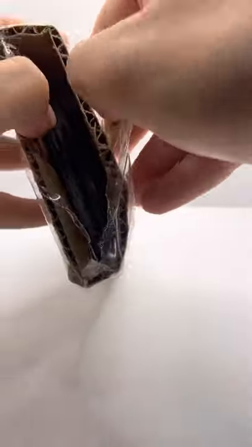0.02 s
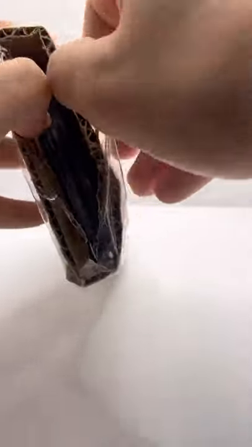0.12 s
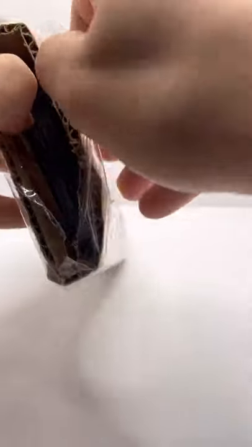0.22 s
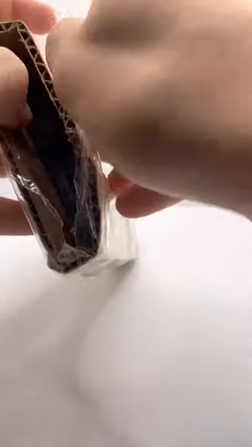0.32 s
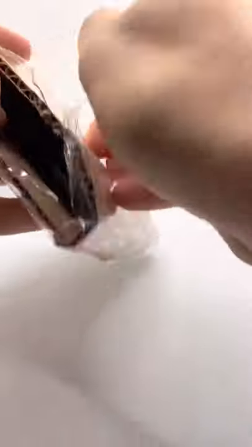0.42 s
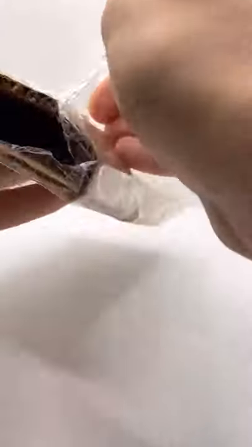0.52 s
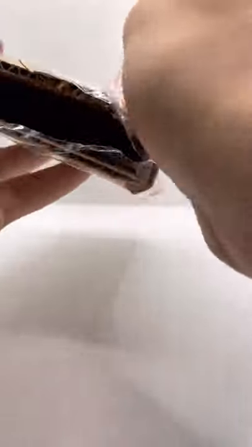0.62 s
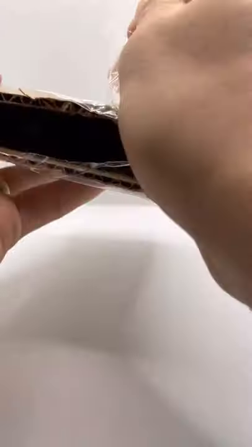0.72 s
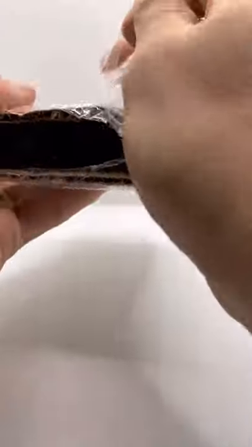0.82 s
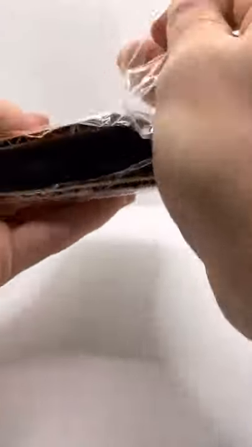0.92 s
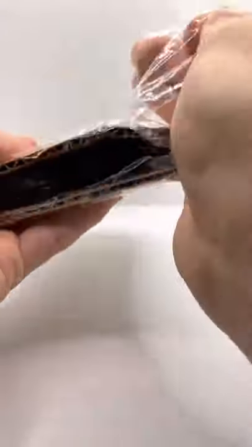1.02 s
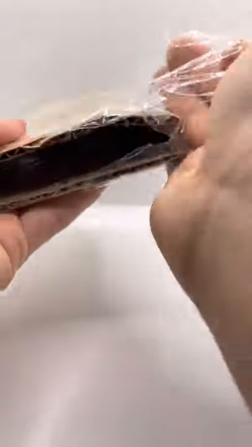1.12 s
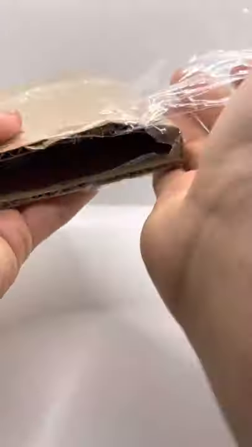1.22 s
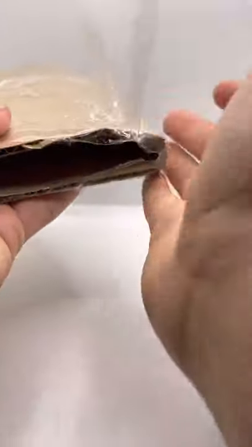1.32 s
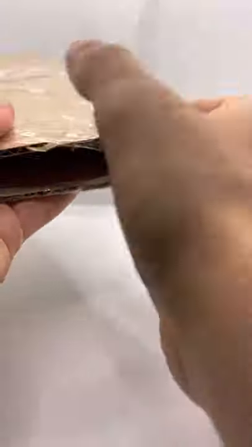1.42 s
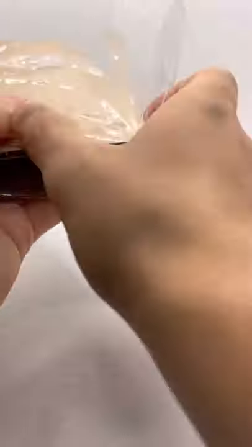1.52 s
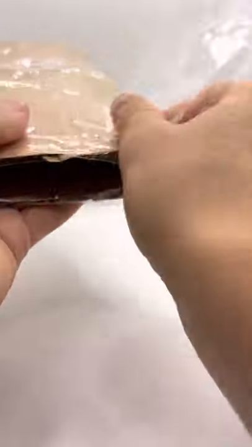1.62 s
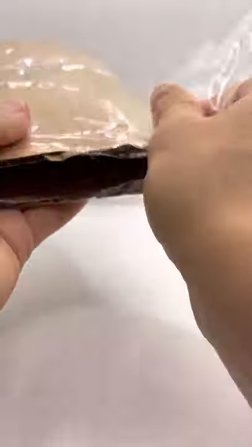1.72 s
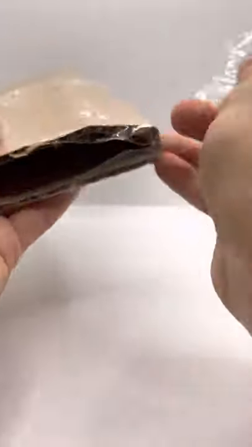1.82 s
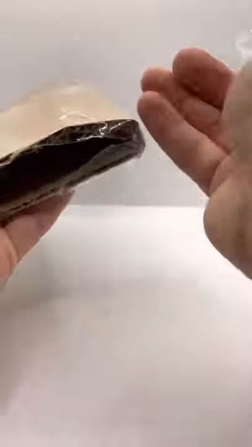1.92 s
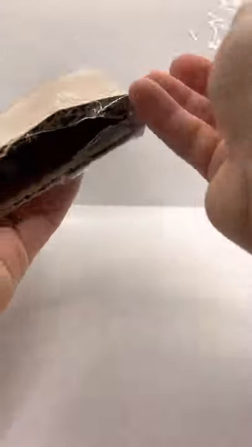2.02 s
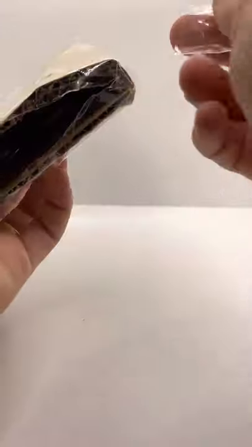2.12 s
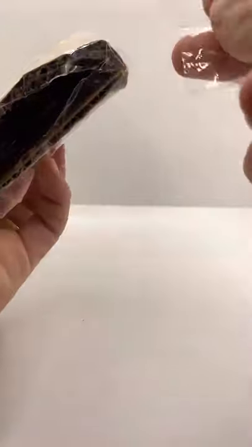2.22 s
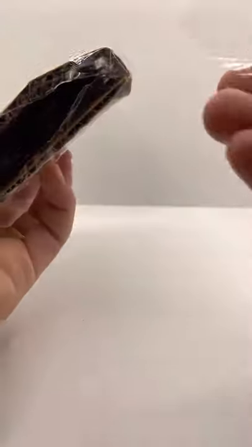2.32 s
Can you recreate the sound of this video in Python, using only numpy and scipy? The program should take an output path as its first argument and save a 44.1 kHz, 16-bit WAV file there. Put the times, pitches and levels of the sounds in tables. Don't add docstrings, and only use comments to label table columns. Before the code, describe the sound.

Thin plastic wrap is picked and ripped off a cardboard mailer: sharp crackling snaps, a second tearing pull, a weak lull, one last burst, then faint crinkles. Close phone microphone in a small quiet room, stereo.

```python
import sys
import numpy as np
from scipy import signal
from scipy.fft import rfft, irfft
from scipy.io import wavfile
from scipy.ndimage import uniform_filter1d

SR = 44100
rng = np.random.default_rng(int(sys.argv[2]) if len(sys.argv) > 2 else 0)


def field_ratio(decibels):
    return 10 ** (np.asarray(decibels, dtype=float) / 20)


def unload_wav(signal):
    wavfile.write(
        sys.argv[1],
        SR,
        np.round(np.clip(np.atleast_2d(signal).T, -1, 1) * 32767).astype(np.int16),
    )


N = 105840

# [f/Hz, level/dB]
RUMBLE_SPECTRUM = [(30, -24), (60, -1.5), (140, 2), (280, 5.5), (450, -6), (1200, -28), (4000, -37),
                   (12000, -52)]
# [f/Hz, time to fall 60 dB/s]
ROOM_DECAY = [(300, 0.24), (1500, 0.12), (5000, 0.13), (12000, 0.1)]
# [t/s, slide level/dB, grip level/dB]
RUSTLE = [(0, -62.5, 11), (.06, -53, 12.5), (.12, -64, 10.5), (.22, -63.5, 14), (.55, -69, -6.5),
          (.66, -75, 1), (.75, -73.5, 5), (1.2, -61, -2.5), (1.35, -79, 3), (1.5, -83.5, -1.5),
          (1.6, -72.5, 5.5), (1.9, -77, -0.5), (2.24, -75.5, -1), (2.4, -74.5, 2)]
# [t/s, peak level/dB, f/Hz]
PUSHES = [(0.322, -32, 257), (0.298, -44, 207), (0.459, -36.5, 238), (0.489, -51, 81), (0.77, -30, 200),
          (0.913, -26, 199), (0.989, -43.5, 151), (1.37, -33, 289), (1.385, -46, 62.3),
          (1.431, -48.5, 59.7), (1.627, -49, 71), (1.766, -37, 290)]
# [t/s, peak level/dB, f/Hz, time to fall 60 dB/s]
RINGS = [(0.2997, -16.5, 1410, .02), (0.322, -24, 600, .04), (0.323, -20.5, 1750, .03),
         (0.275, -16, 4090, .02), (0.432, -33.5, 1450, .03), (0.456, -22, 1400, .03),
         (0.771, -12, 1500, .04), (0.77, -25, 4080, .03), (0.776, -15, 4550, .04),
         (0.913, -20.5, 1750, .03), (0.95, -20, 4140, .03), (0.989, -12.5, 2260, .02),
         (1.152, -27.5, 2730, .03), (1.714, -24.5, 1680, .04), (1.903, -41.5, 1320, .02)]
# [t/s, peak level/dB, board level/dB, sizzle level/dB, swarm/s]
SNAPS = [(0.0562, -32, 3, -8, 0.0085), (0.0698, -35, 5.5, -13, 0.015), (0.144, -44.5, -16, -6, 0.005),
         (0.1548, -44.5, -25, 3, 0.0046), (0.1898, -35.5, -9, 7.5, 0.0073), (0.2466, -16, -12, -5, 0.003),
         (0.2732, -13.5, -9.5, -1.5, 0.0037), (0.296, -28.5, 5, -15.5, 0.0055),
         (0.305, -15, -21, -3, 0.004), (0.3217, -9.5, -10, -4.5, 0.0038), (0.3613, -19.5, -30, 3.5, 0.0025),
         (0.3767, -31, -18, 3.5, 0.004), (0.39, -17.5, -32.5, 1, 0.0027), (0.405, -15, -5, 1.5, 0.0091),
         (0.5825, -43.5, -6, -14, 0.0064), (0.758, -44, -13, -15, 0.012), (0.7703, -11.5, -3.5, -3, 0.01),
         (0.8849, -18.5, -6.5, -2.5, 0.0018), (0.9129, -15, -1.5, 1.5, 0.0026), (0.95, -19.5, 5, 2, 0.0025),
        (0.9802, -13.5, -5.5, -5, 0.0031), (0.9898, -13, -8.5, -3.5, 0.0063),
        (1.045, -15.5, -13.5, -10.5, 0.0019), (1.063, -23.5, -17, -2, 0.0041), (1.0826, -32, -6, 3, 0.0067),
        (1.1084, -26, -12, 3.5, 0.0039), (1.1529, -23.5, -5.5, -0.5, 0.0033),
        (1.1726, -28.5, -6, 1.5, 0.0068), (1.2246, -29.5, -14.5, -4.5, 0.0081),
        (1.255, -27.5, -22, -2.5, 0.014), (1.286, -37.5, -8, 9, 0.003),
        (1.3692, -57.5, 16.5, -19.5, 0.0046), (1.4738, -49, 3, -36, 0.0015),
        (1.61, -38.5, -35, -28, 0.0015), (1.6212, -26.5, -18, -4.5, 0.0072), (1.688, -28, -16, 1, 0.0056),
        (1.7158, -12, -12.5, -4, 0.0092), (1.727, -19, -7, 2.5, 0.0047), (1.7583, -22, -8, -15, 0.0036),
        (1.7653, -12.5, -37, -0.5, 0.0012),
         (0.265, -28.5, -13.5, -1.5, 0.0041), (0.42, -15, -16.5, -5.5, 0.0024),
           (0.428, -18.5, -3, -2.5, 0.0095), (0.4524, -13.5, -10, -3, 0.0018),
           (0.466, -28, -8.5, 3, 0.0048), (0.485, -25, -3, 4.5, 0.0029),
           (0.4857, -20.5, -17.5, -1.5, 0.0011), (0.913, -10.5, -7.5, -9.5, 0.0059),
           (0.957, -16.5, -10, -12.5, 0.0074), (1.013, -22.5, -23, -10, 0.01), (1.277, -39, -9, -2, .002),
           (1.128, -47, -27.5, 3.5, 0.0027), (1.769, -19.5, -21, -5, .004),
           (1.7697, -11.5, -12.5, 2.5, 0.0016), (1.784, -17.5, -5.5, -2, 0.0019),
           (1.792, -27.5, -9, -2.5, 0.0043), (1.805, -27, -3.5, 4, 0.0035)]
# [t/s, peak level/dB, board level/dB, sizzle level/dB, swarm/s]
CRINKLES = [(1.399, -54.5, -3.5, -10.5, 0.0075), (1.57, -60.5, 6.5, 2, .006),
            (1.6366, -34.5, -0.5, 5.5, 0.0071), (1.654, -33.5, -2.5, 0.5, 0.007),
            (1.8592, -42.5, -12, -2.5, 0.0028), (1.8722, -45, -5.5, -10, 0.0039),
            (1.9027, -32.5, -11, 4, 0.0032), (1.9444, -45, 1.5, -10, 0.013), (2.003, -42.5, -6, -13, .0015),
            (2.036, -48.5, -6.5, -3, 0.0072), (2.0575, -42.5, -16, 6.5, 0.0021),
            (2.1233, -36.5, -6, -10, 0.0017), (2.179, -50, 3, -20, .002), (2.214, -57, -10, -25.5, 0.0042),
            (2.2647, -53.5, 5, -23, 0.0039), (2.287, -43.5, -7.5, -17, 0.0043),
            (2.306, -39.5, -10, -16.5, .0015), (2.3217, -35.5, -12, -5, 0.00072),
            (2.353, -46.5, -4.5, -10, 0.011), (2.373, -48, -2, -8, .003)]
# [t/s, effort level/dB]
PULLS = [
    [(.247, -44), (.33, -50.5), (.40, -38), (.41, -32), (.455, -28.5), (.495, -37.5), (.512, -74)],
    [(.914, -28), (.96, -25.5), (1.0, -32), (1.04, -42), (1.10, -65)],
    [(1.255, -38), (1.295, -55.5), (1.32, -87.5)],
    [(1.61, -64), (1.71, -43.5), (1.74, -38.5), (1.77, -26), (1.81, -40), (1.84, -63)],
]
# [f/Hz, width/Hz, lift level/dB]
PANEL = [(598.6, 90, 3.3), (1500, 27, 1.1), (4080, 63, 1)]
# [f/Hz, level/dB]
MIC_COLOUR = [(1500, 1.5), (3000, 0.5), (6500, 4), (11200, 12.5), (12500, 3.5), (13500, -8), (15000, -15.5)]
# [f/Hz, phase/radians]
LEFT_LEAD = [(1700, 0), (2800, .9), (4200, .7), (5800, 6.2), (8300, 9.15), (9700, 9.6), (12000, 12.4),
             (13800, 12.7), (14500, 15.6)]
# [f/Hz, likeness/0-1]
CHANNEL_LIKENESS = [(300, .994), (800, .93), (1150, .55), (1450, .97), (2100, .95), (2700, .45), (4300, .8),
                    (4900, .92), (5800, .97), (7300, .82), (8400, .998), (9700, .998), (10500, .92),
                    (13000, .98)]
# [t/s, level/dB]
ASIDE = [
    (0.221, -27.5),
    (.3, -17.5),
    (0.401, -16.5),
    (0.419, -37),
    (.97, -45.5),
    (0.991, -10.5),
    (1.3, -16),
    (1.6, -17.5),
    (1.79, -14),
    (1.812, -17),
]

ROOM_DB = -12.5
RUMBLE_DB, HUM_DB, LUMPS_DB = -62.5, -63, 1.1
HUM_HZ, HUM_WIDTH_HZ = 144, 29
PUSH_CYCLES, PUSH_DB, PUSH_LOW_HZ = 6, 5.5, 60
RING_RISE_S = 0.0009
BOARD, FILM, SIZZLE = (400, 2200, 5), (1800, 7500, 4), (7000, 14500, 5)
CRACKS_PER_S, SPREAD_DB = 12000, 3.5
CLUMP_DB, CLUMPS_PER_S = 2.5, 160
RISE_S, DIE_S, CREST_DB = 0.00011, 0.0034, -8.5
FIRST_CRACK, FIRST_S = 0.25, 0.0012
PULL_BOARD_DB, PULL_SIZZLE_DB = -6.5, -4
RUSTLE_BOARD_DB, RUSTLE_SIZZLE_DB = -1.5, -4
PANEL_LOW_HZ = 320
EDGE_HZ = 16400
ASIDE_HZ, ASIDE_WIDTH_HZ = 9300, 2700
CEILING = 0.8


def evened(x):
    return x / np.sqrt(np.mean(x ** 2) + 1e-20)


def read(points, hz):
    f, value = np.transpose(points)
    return np.interp(np.log(hz + 1), np.log(f + 1), value)


def add(mix, s, sound):
    part = mix[..., round(s * SR):][..., :sound.shape[-1]]
    part += sound[..., :part.shape[-1]]


def shaped(x, gain):
    return irfft(rfft(x) * gain, N)


def rumble():
    hz = np.fft.rfftfreq(N, 1 / SR)
    s, _, grip_db = np.transpose(RUSTLE)
    wide = evened(shaped(rng.standard_normal(N), field_ratio(read(RUMBLE_SPECTRUM, hz))))
    drone = evened(shaped(rng.standard_normal(N), 1 / (1 + ((hz - HUM_HZ) / HUM_WIDTH_HZ) ** 2)))
    lumps = evened(shaped(rng.standard_normal(N), 1 / (1 + (hz / 24.0) ** 2)))
    swell_db = LUMPS_DB * lumps + np.interp(np.arange(N) / SR, s, grip_db)
    return (field_ratio(RUMBLE_DB) * wide + field_ratio(HUM_DB) * drone) * field_ratio(swell_db)


def room(x):
    taps = np.zeros(SR // 2)
    at = np.arange(200, len(taps) - 20, 10)
    taps[at + rng.integers(0, 10, len(at))] = rng.choice([-1., 1.], len(at))
    hz, t, z = signal.stft(taps, SR, nperseg=256)
    fade = field_ratio(-60 * t / read(ROOM_DECAY, hz)[:, None])
    tail = signal.istft(z * fade, SR, nperseg=256)[1]
    return signal.fftconvolve(x, tail / np.linalg.norm(tail))[:N]


def pushes():
    out, t = np.zeros(N), np.arange(8000) / SR
    for s, db, hz in PUSHES:
        thud = np.sin(2 * np.pi * hz * t) + 0.5 * np.sin(2 * np.pi * hz * t / 1.3)
        fade = field_ratio(db + PUSH_DB - 60 * t * hz / PUSH_CYCLES)
        add(out, s, fade * np.minimum(t / 0.002, 1) * thud)
    return signal.sosfilt(signal.butter(2, PUSH_LOW_HZ, "high", fs=SR, output="sos"), out)


def rings():
    out, t = np.zeros(N), np.arange(4000) / SR
    wavers = rng.standard_normal((len(RINGS), 4000))
    for (s, db, hz, t60), waver in zip(RINGS, wavers):
        turns = np.cumsum(hz * (1 + 0.3 * uniform_filter1d(waver, size=80))) / SR
        fade = field_ratio(db - 60 * t / t60)
        add(out, s, fade * np.minimum(t / RING_RISE_S, 1) * np.sin(2 * np.pi * turns))
    return out


def cracks(low_hz, high_hz, cycles, count):
    size = field_ratio(SPREAD_DB * np.minimum(rng.exponential(1, N), 5)) * rng.choice([-1, 1], N)
    size = size * (rng.random(N) < CRACKS_PER_S / SR)
    patch = rng.integers(0, count, N)
    t, out = np.arange(1024) / SR, np.zeros(N)
    steps = np.arange(N) * CLUMPS_PER_S / SR
    for k, hz in enumerate(np.geomspace(low_hz, high_hz, count)):
        ring = np.exp(-t * hz / cycles) * (1 - np.exp(-t * hz)) * np.sin(2 * np.pi * hz * t)
        ring = np.sqrt(hz) * ring / np.linalg.norm(ring)
        clump_db = CLUMP_DB * np.interp(steps, np.arange(N // 100), rng.standard_normal(N // 100))
        out += signal.oaconvolve(size * field_ratio(clump_db) * (patch == k), ring)[:N]
    return evened(out)


def strain():
    power, now, t = np.zeros((3, N)), np.arange(N) / SR, np.arange(4000) / SR
    for s, db, board_db, sizzle_db, length in [*SNAPS, *CRINKLES]:
        swarm = np.exp(-np.maximum(t - length, 0) / DIE_S)
        shape = np.minimum(t / RISE_S, 1) * (swarm + FIRST_CRACK * np.exp(-t / FIRST_S))
        peak_db = db + CREST_DB + np.array([[board_db], [0], [sizzle_db]])
        add(power, s, (field_ratio(peak_db) * shape) ** 2)
    for pull in PULLS:
        effort_db = np.interp(now, *np.transpose(pull), left=-120, right=-120)
        power += field_ratio(effort_db + np.array([[PULL_BOARD_DB], [0], [PULL_SIZZLE_DB]])) ** 2
    slide_db = np.interp(now, *np.transpose(RUSTLE)[:2])
    slide = field_ratio(slide_db + np.array([[RUSTLE_BOARD_DB], [0], [RUSTLE_SIZZLE_DB]]))
    return np.sqrt(power + slide ** 2)


def wrap(strength):
    hz = np.fft.rfftfreq(N, 1 / SR)
    panel = 1
    for peak_hz, width, db in PANEL:
        panel = panel + (field_ratio(db) - 1) / (1 + 2j * (hz - peak_hz) / width)
    panel = panel * (1j * hz / (PANEL_LOW_HZ + 1j * hz)) ** 2
    swarms = np.array([cracks(*part, count=16) for part in (BOARD, FILM, SIZZLE)])
    return shaped((strength * swarms).sum(0), panel)


def scene():
    strength = strain()
    straight = wrap(strength) + rings() + pushes()
    scattered = wrap(strength)
    return np.array([x + field_ratio(ROOM_DB) * room(x) + rumble() for x in (straight, scattered)])


def band_limit(x):
    return signal.sosfilt(signal.butter(12, 16470, fs=SR, output="sos"), x)


def record(dry):
    hz = np.fft.rfftfreq(N, 1 / SR)
    turn = np.exp(0.5j * np.interp(hz, *np.transpose(LEFT_LEAD)))
    angle = np.arccos(np.clip(read(CHANNEL_LIKENESS, hz), 0, 1)) / 2
    colour = field_ratio(read(MIC_COLOUR, hz)) / (1 + (hz / EDGE_HZ) ** 300)
    same = rfft(dry[0]) * np.cos(angle)
    other = rfft(dry[1]) * np.sin(angle)
    ports = irfft(colour * np.array([(same + other) * turn, (same - other) / turn]), N)
    aside = shaped(dry[1], colour / (1 + ((hz - ASIDE_HZ) / ASIDE_WIDTH_HZ) ** 4))
    ports = ports + aside * field_ratio(np.interp(np.arange(N) / SR, *np.transpose(ASIDE)))
    push = ports / CEILING
    mix = CEILING * np.tanh(push * (1 + push ** 2 / 3))
    return band_limit(mix)


dry = scene()
out = record(dry)
unload_wav(out)
```